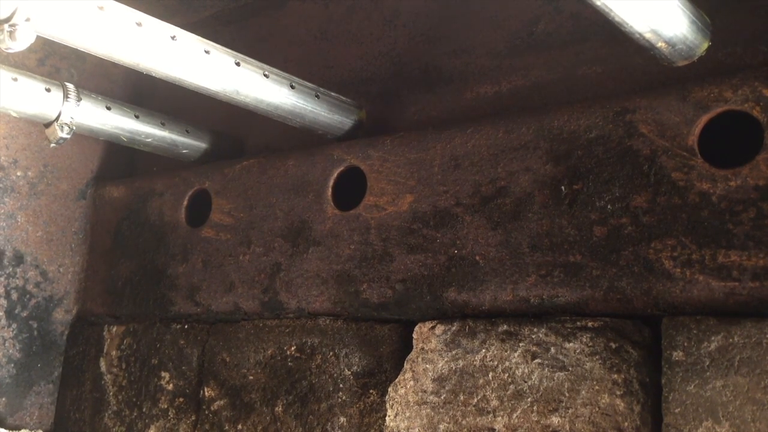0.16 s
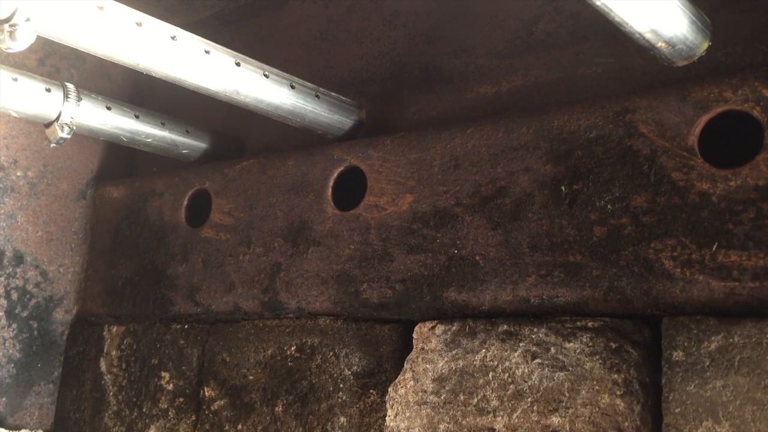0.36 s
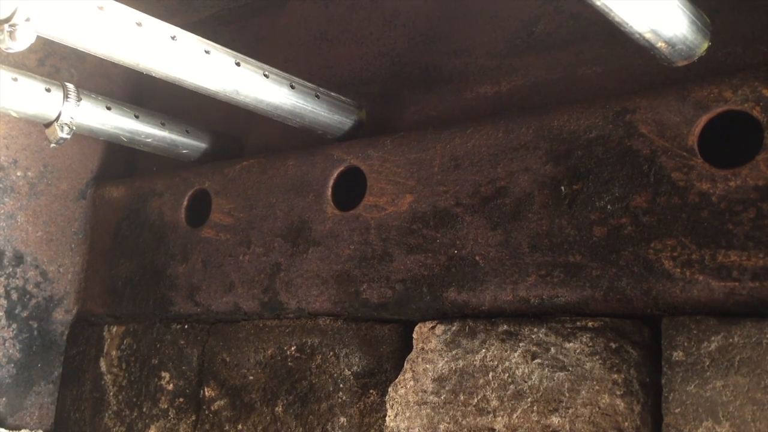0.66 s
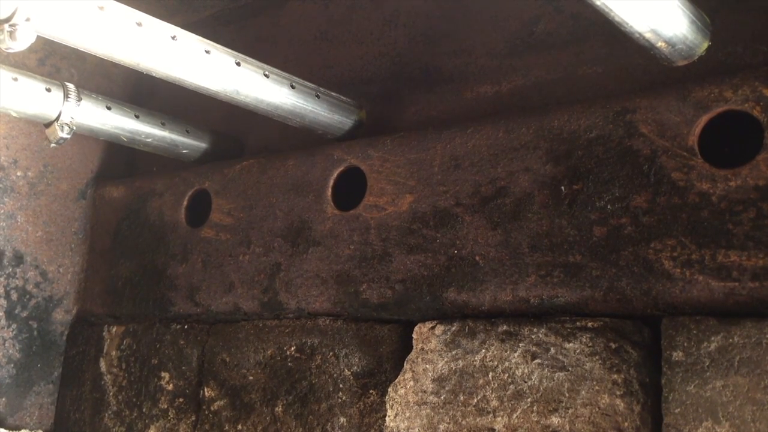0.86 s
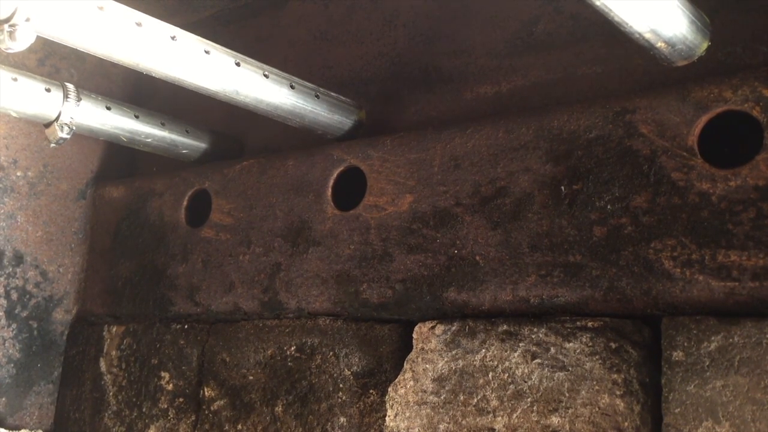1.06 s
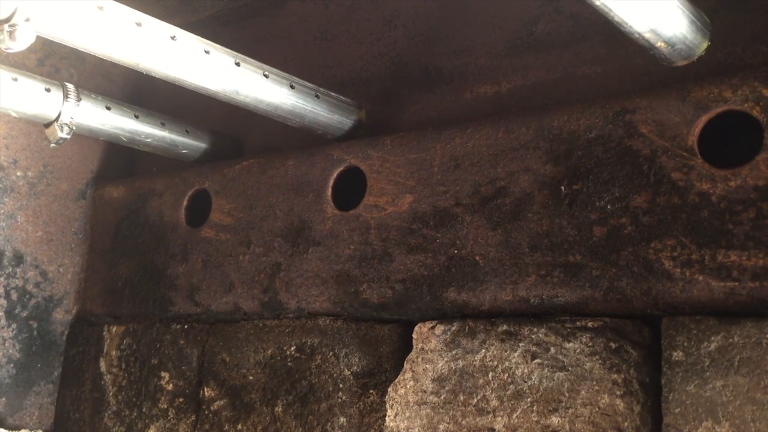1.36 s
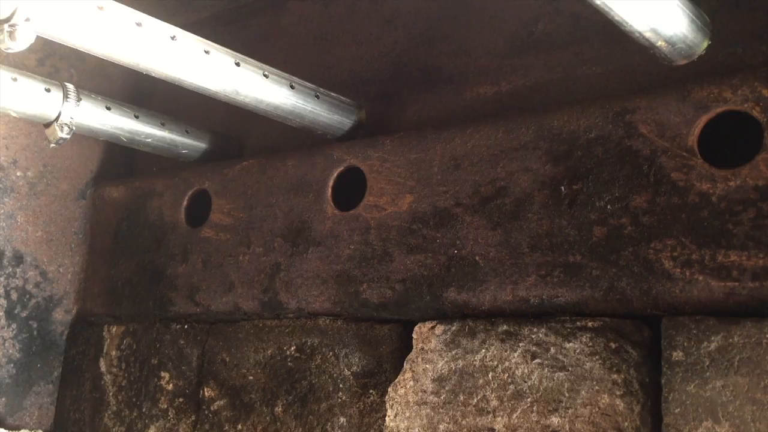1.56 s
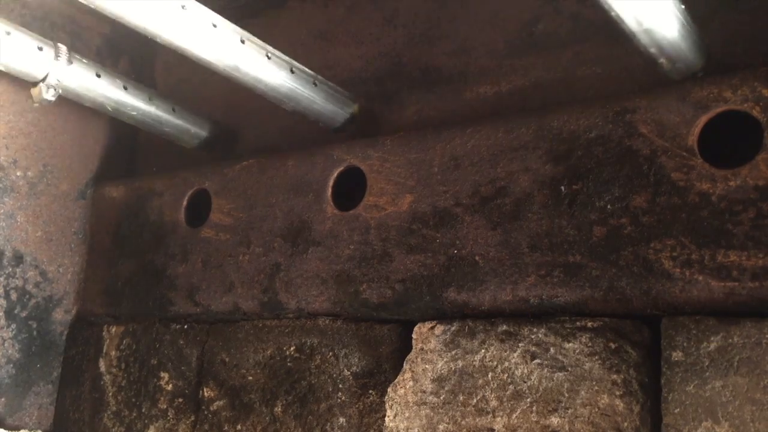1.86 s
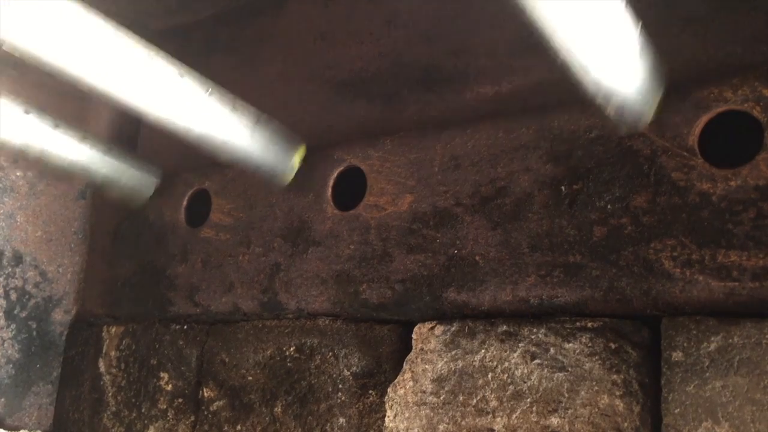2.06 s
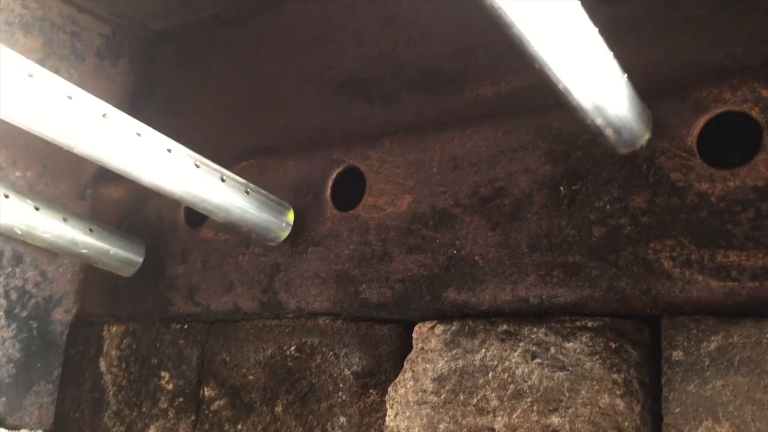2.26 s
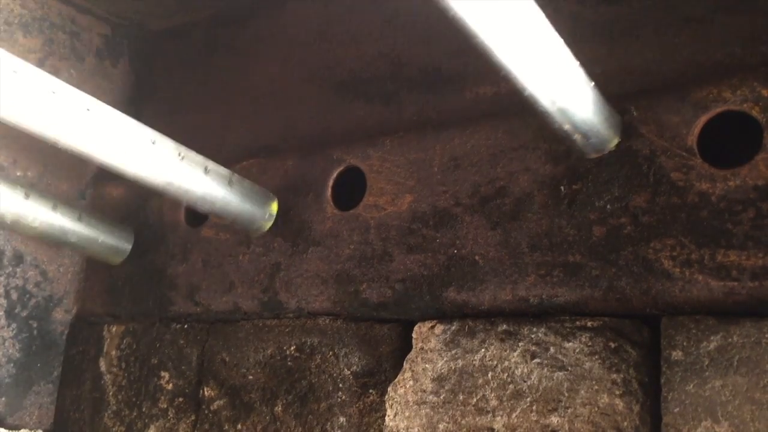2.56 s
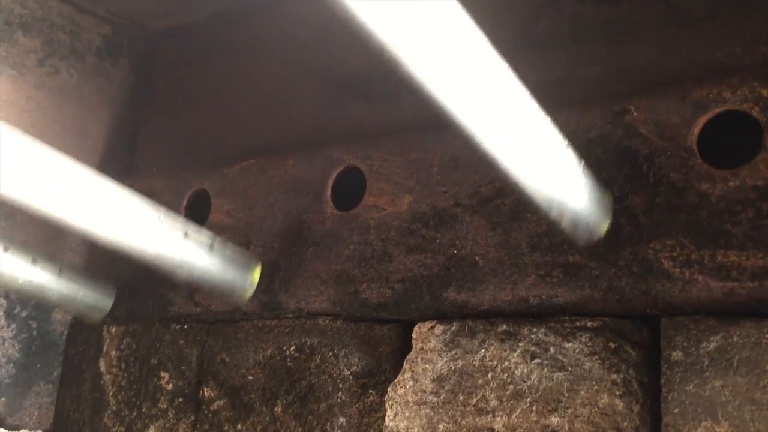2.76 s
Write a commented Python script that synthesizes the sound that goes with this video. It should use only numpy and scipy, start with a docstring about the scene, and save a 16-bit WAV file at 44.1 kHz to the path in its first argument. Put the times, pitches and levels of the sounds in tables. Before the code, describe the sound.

Steel tubes scrape and clatter inside a stove's firebox, close to the microphone. They first slide with a dry hiss, small pings and short squeaks, then clank loudly against a metal channel over low booms, ending with lighter scrapes.

```python
"""Perforated steel tubes are worked loose inside a stove's firebox, close to the microphone.
Over a faint rumble they first slide with a dry hiss, ping, and scrape hard enough to sing and groan.
From about 1.7 s they clatter against the steel channel, loudest near 2.25 s; last come lighter slides
and scrapes. Each contact is a burst of tiny impacts that excites the modes of the tubes and the box,
and the stove wall booms under the heavy ones."""
import sys
import numpy as np
from scipy import signal
from scipy.fft import rfft, irfft
from scipy.io import wavfile
from scipy.ndimage import uniform_filter1d

SR = 44100
rng = np.random.default_rng(int(sys.argv[2]) if len(sys.argv) > 2 else 0)


def output_pcm(signal):
    """Save a mono or channel-first signal as 16-bit PCM at the path in sys.argv[1].

    Samples are clipped to [-1, 1] before scaling.
    """
    pcm = np.clip(np.atleast_2d(signal).T, -1, 1) * 32767
    wavfile.write(sys.argv[1], SR, np.round(pcm).astype(np.int16))


N = 127890
SCRAPE_GRIP = dict(rise_s=0.0046, fall_s=0.004, impacts_per_s=1400)  # drives scrapes and groans


def amp(db):
    return 10 ** (np.asarray(db) / 20)


def unit(x):
    """Normalisation to an energy of 1."""
    return x / np.sqrt(np.sum(x ** 2) + 1e-20)


def curve_at(points, hz):
    """Interpolation on a logarithmic frequency axis."""
    point_hz, values = np.transpose(points)
    return np.interp(np.log(hz + 1), np.log(point_hz + 1), values)


def add(mix, start_s, sound):
    """Superposition: a sound joins the mix at its start time."""
    part = mix[max(round(start_s * SR), 0):][:len(sound)]
    part += sound[:len(part)]


def coloured(x, colour):
    """Linear filtering: the spectrum is multiplied by a gain curve given in dB."""
    hz = np.fft.rfftfreq(len(x), 1 / SR)
    return irfft(rfft(x) * amp(curve_at(colour, hz)), len(x))


def firebox(colour):
    """Reverberation: strong early reflections, a dense tail shorter in the treble, and a faint room."""
    # Each row: frequency in Hz, time in seconds for the firebox's modes to fall 60 dB.
    decay_times = [(100, 1), (600, 0.34), (2500, 0.12), (15000, 0.16)]
    room_db, room_t60 = -34, 1
    early_db, early_s = 4.5, 0.0084
    size = SR // 2
    flat_noise = irfft(np.exp(2j * np.pi * rng.random(size // 2 + 1)), size)
    hz, t, spectra = signal.stft(coloured(flat_noise, colour), SR, nperseg=256)
    box_decay = amp(-60 * t / curve_at(decay_times, hz)[:, None])
    room_decay = amp(room_db - 60 * t / room_t60)
    tail = signal.istft(spectra * (box_decay + room_decay), SR)[1][:size]
    early_boost = 1 + amp(early_db) * np.exp(-np.arange(size) / SR / early_s)
    return unit(tail * early_boost)


def tube_ring(modes, t60, detune_hz):
    """Beating: nearly alike tubes ring together, each mode's strength set by the spot struck."""
    tubes, spot_db = 3, -3
    draws = rng.uniform(-0.82, 1, (len(modes), tubes, 3))
    t = np.arange(SR // 4) / SR
    tone = np.zeros(len(t))
    for (hz, db), per_tube in zip(modes, draws):
        for detune, spot, phase in per_tube:
            angle = 2 * np.pi * (hz + detune_hz * detune) * t + np.pi * phase
            tone += amp(db + spot_db * spot) * np.sin(angle)
    return unit(np.pad(tone * amp(-60 * t / t60), (0, SR // 2 - len(t))))


def contact(body, length_s, db, tilt, rise_s, fall_s, impacts_per_s, spread_db):
    """Roughness excitation: tiny uneven impacts are convolved with the body's impulse response."""
    size = SR // 2
    t, hz = np.arange(size) / SR, np.fft.rfftfreq(2 * size, 1 / SR)
    onset = np.sin(np.pi / 2 * np.minimum(t / rise_s, 1)) ** 2
    force = onset * np.exp(-np.maximum(t - length_s, 0) / fall_s)
    impacts = rng.choice([-1., 1.], size) * (rng.random(size) < impacts_per_s / SR)
    impacts *= amp(spread_db * np.minimum(rng.exponential(1, size), 3))
    brightness = amp(tilt * np.log2(np.maximum(hz, 700) / 700))  # tilt: dB per octave above 700 Hz
    response = irfft(rfft(impacts * force, 2 * size) * rfft(body, 2 * size) * brightness)
    return amp(db) * np.linalg.norm(force) * unit(response)


def mode(hz, db, t60):
    """Damped oscillation: a sinusoid falls 60 dB in t60 seconds."""
    t = np.arange(SR) / SR
    return amp(db) * np.exp(-np.log(1000) * t / t60) * np.sin(2 * np.pi * hz * t)


def scrapes():
    """Frictional excitation of modes: a tube drags hard over an edge and sings."""
    # Each row: start in seconds, length in seconds, level in dB, tilt in dB per octave.
    drags = [(0, 0.044, -47.5, -4.5), (0.783, 0.036, -29, 1), (0.819, 0.042, -34.5, -1.5),
             (0.864, 0.016, -22.5, 0), (0.898, 0.12, -47, -1), (1.017, 0.079, -40.5, 1),
             (1.421, 0.044, -50, -5), (1.932, 0.063, -41.5, -2), (2.657, 0.045, -36, -6.5),
             (2.883, 0.013, -34, -5)]
    # Each row: frequency in Hz, relative level in dB of a mode of the scraped tube.
    singing_modes = [(1195, -5.5), (2280, 0), (4000, -6.5), (7400, -4.5), (8825, 8.5), (9022, -10),
                     (9820, -8)]
    # Each row: frequency in Hz, relative level in dB of the dense wash of weaker modes.
    colour = [(250, -3), (750, -6.5), (1150, 8), (1500, -7), (2400, 6.5), (3300, -4.5), (4000, 5.5),
              (4700, -5), (8200, -1), (9300, 15), (10300, 3), (15000, -1.5)]
    out, wash = np.zeros(N), firebox(colour)
    for start_s, length_s, db, tilt in drags:
        body = wash + amp(2) * tube_ring(singing_modes, t60=0.21, detune_hz=29)
        add(out, start_s, contact(body, length_s, db, tilt, **SCRAPE_GRIP, spread_db=4))
    return out


def groans():
    """Forced resonance: friction drives one hollow, well-damped mode as a tube turns in its seat."""
    # Each row: start in seconds, length in seconds, level in dB.
    turns = [(0, .1, -50.5), (0.775, .06, -43), (0.858, .52, -59)]
    out, resonance = np.zeros(N), mode(hz=388.7, db=0, t60=0.028)
    body = signal.fftconvolve(resonance, resonance)[:SR // 2]  # filtering twice steepens the skirts
    for start_s, length_s, db in turns:
        add(out, start_s, contact(body, length_s, db, tilt=0, **SCRAPE_GRIP, spread_db=1.5))
    return out


def room_rumble():
    """Filtered noise: the firebox colours a faint, steady rumble from the room."""
    # Each row: frequency in Hz, relative spectral density in dB.
    colour = [(25, -25), (73, 0.5), (110, 4.5), (220, -52), (350, -8.5), (480, -26.5), (1300, -21.5),
              (1860, -15.5), (2300, -26.5), (15000, -34)]
    rms_db = -55
    return amp(rms_db) * np.sqrt(N) * unit(coloured(rng.standard_normal(N), colour))


def slides():
    """Friction noise: a tube slides lightly over rust, and its dense impacts merge into a hiss."""
    # Each row: start in seconds, length in seconds, level in dB, tilt in dB per octave.
    strokes = [(0.113, 0.055, -41, -3), (0.266, 0.11, -47, -1), (0.408, 0.057, -38.5, -1),
               (0.457, 0.066, -40.5, 2), (0.556, 0.16, -48, -1), (0.652, 0.014, -40, -1.5),
               (1.108, 0.14, -48, 1.5), (1.262, 0.12, -54, 2), (1.399, 0.014, -46.5, -0.5),
               (2.434, 0.13, -45, -6.5), (2.53, 0.041, -33.5, -3.5), (2.578, 0.052, -37.5, -3.5),
               (2.579, 0.3, -46.5, -5.5)]
    # Each row: frequency in Hz, relative level in dB of the hiss.
    colour = [(250, -17), (600, -8.5), (4500, -0.5), (8000, 0), (9300, 4), (10400, 0), (15000, -1.5)]
    out, wash = np.zeros(N), firebox(colour)
    for start_s, length_s, db, tilt in strokes:
        hiss = contact(wash, length_s, db, tilt,
                       rise_s=0.23 * length_s, fall_s=0.0071, impacts_per_s=2600, spread_db=7)
        add(out, start_s, hiss)
    return out


def knocks():
    """Impact excitation: tubes chatter against the channel and ring together with the firebox."""
    # Each row: start in seconds, length in seconds, level in dB, tilt in dB per octave.
    hits = [(0.155, 0.01, -35, -1), (1.258, 0.012, -42.5, 1), (1.717, 0.051, -24, 1),
            (1.745, 0.014, -17, 9.5), (1.77, 0.026, -22, -2), (1.79, 0.078, -30.5, 4),
            (1.8837, 0.0053, -25.5, 5.5), (1.889, 0.027, -29, -2.5), (1.998, 0.013, -21.5, -1.5),
            (2.011, 0.014, -18, -1), (2.038, 0.0093, -15, 0), (2.053, 0.04, -25.5, 1),
            (2.11, 0.048, -24, 4.5), (2.135, 0.013, -17, -0.5), (2.147, 0.013, -21.5, 0.5),
            (2.2037, 0.013, -15.5, -2.5), (2.222, 0.02, -19, 1.5), (2.241, 0.027, -9.5, 2),
            (2.7411, 0.0034, -22.5, -8)]
    # Each row: frequency in Hz, relative level in dB of a mode of the struck tubes.
    tube_modes = [(828, -8), (1180, 2), (1298, -3.5), (1595, -16), (2435, 0), (2948, -2.5), (3560, 1.5),
                  (3844, -4), (4078, 2), (5470, -1.5), (8807, -4.5)]
    # Each row: frequency in Hz, relative level in dB of the dense wash of weaker modes.
    colour = [(25, -9), (200, -14), (450, -2), (950, -1.5), (1400, 3), (2600, 2), (3250, -5.5), (3900, 1.5),
              (4800, -11.5), (5600, -3), (6200, -10.5), (8100, -10.5), (9200, -4.5), (10400, -11),
              (15000, -21.5)]
    out = np.zeros(N)
    for start_s, length_s, db, tilt in hits:
        body = firebox(colour) + amp(-2.5) * tube_ring(tube_modes, t60=0.12, detune_hz=22.7)
        clank = contact(body, length_s, db, tilt,
                        rise_s=0.21 * length_s, fall_s=0.0047, impacts_per_s=3000, spread_db=1.5)
        add(out, start_s, clank)
    return out


def wall_booms():
    """Plate resonance: the stove wall's lowest mode swells and dies after each heavy push."""
    # Each row: start in seconds, level in dB, time in seconds to fall 60 dB.
    pushes = [(0.171, -41, 0.54), (.865, -40, 1), (1.744, -28, 0.79), (2.029, -23.5, 0.47),
              (2.286, -20.5, 0.59), (2.47, -28.5, 0.72), (2.728, -32, 0.87)]
    wall_hz, rise_s = 116, 0.024
    out, onset = np.zeros(N), np.minimum(np.arange(SR) / SR / rise_s, 1)
    for start_s, db, t60 in pushes:
        add(out, start_s, onset * mode(wall_hz, db, t60))
    return out


def pings():
    """Free vibration: a glancing tap leaves one partial ringing, briefly modulated by chatter."""
    # Each row: start in seconds, frequency in Hz, level in dB, time in seconds to fall 60 dB.
    taps = [(0.178, 1396, -36.5, 0.14), (0.327, 5060, -29.5, 0.17), (0.329, 5730, -29, 0.089),
            (2.249, 5485, -5.5, 0.089), (2.251, 2423, -1.5, 0.059), (2.27, 7025, -37.5, 0.46),
            (2.62, 7600, -48, 0.7), (2.88, 2916, -33.5, 0.13)]
    rise_s, chatter_s = 0.002, 0.057
    out, t = np.zeros(N), np.arange(SR) / SR
    onset = np.minimum(t / rise_s, 1)
    for start_s, hz, db, t60 in taps:
        chatter = np.sqrt(SR) * unit(uniform_filter1d(rng.standard_normal(SR), size=60))
        modulation = 1 + chatter * np.exp(-t / chatter_s) / 2
        add(out, start_s, onset * modulation * mode(hz, db, t60))
    return out


def scene():
    """Superposition: the pressures of all sources add in one channel."""
    return (knocks() + slides() + scrapes() + groans() + pings() + wall_booms() + room_rumble())[None]


def record(dry):
    """Saturation and band limiting: the microphone rounds the loudest clash and trims both extremes."""
    ceiling, low_cut_hz, high_cut_hz = 0.7, 48, 15300
    rounded = ceiling * np.tanh(dry / ceiling)
    highpass = signal.butter(2, low_cut_hz, "high", fs=SR, output="sos")
    lowpass = signal.firwin(511, high_cut_hz, window=("kaiser", 9), fs=SR)
    return signal.oaconvolve(signal.sosfilt(highpass, rounded), lowpass[None], "same")


dry = scene()
out = record(dry)
output_pcm(out)
```